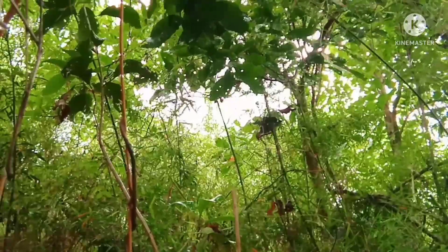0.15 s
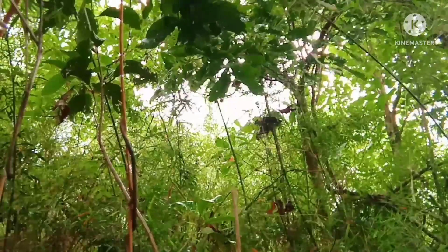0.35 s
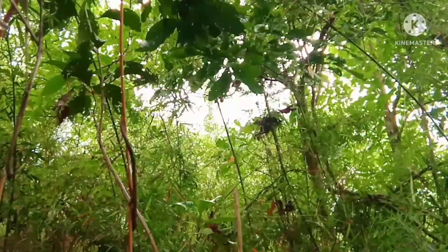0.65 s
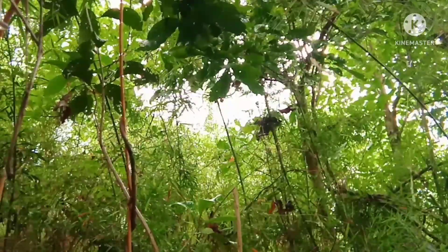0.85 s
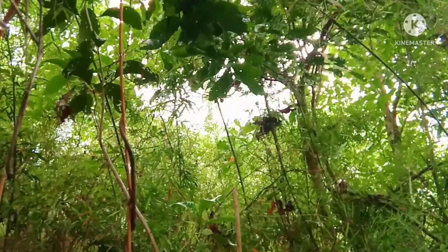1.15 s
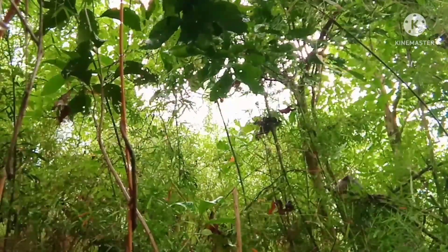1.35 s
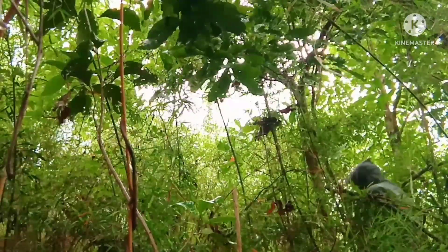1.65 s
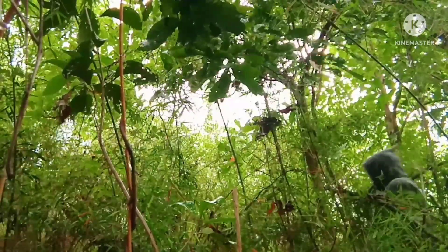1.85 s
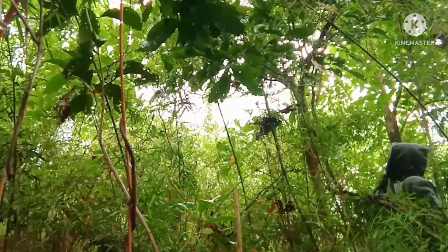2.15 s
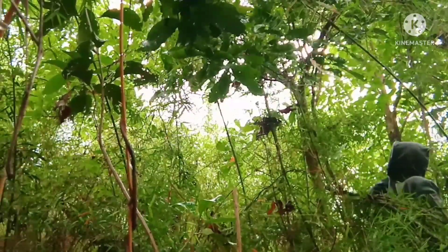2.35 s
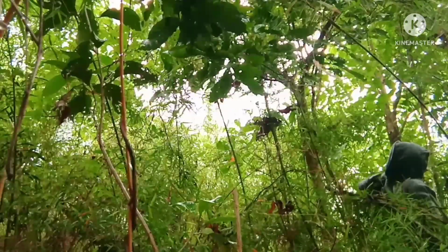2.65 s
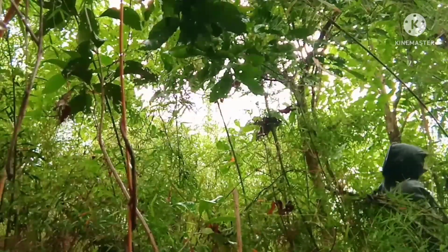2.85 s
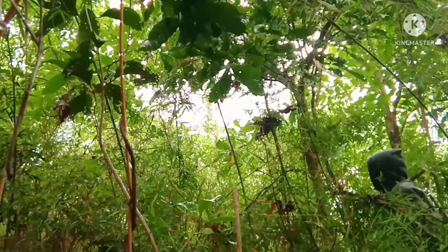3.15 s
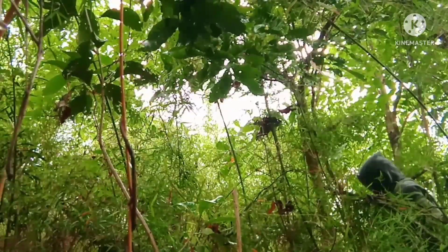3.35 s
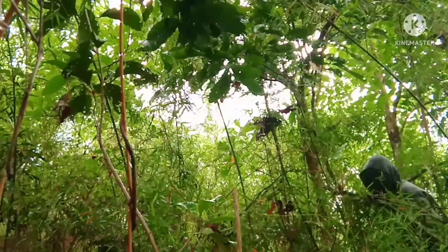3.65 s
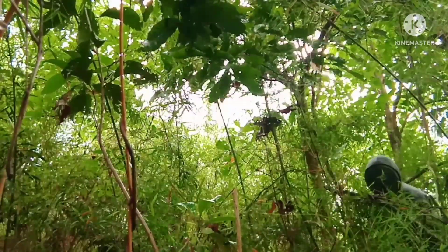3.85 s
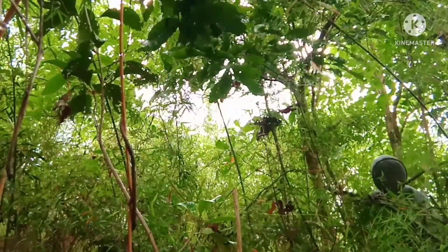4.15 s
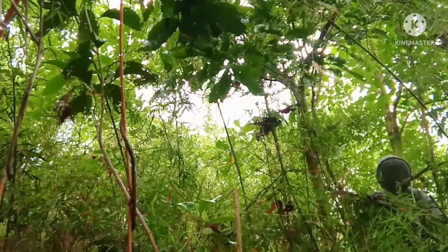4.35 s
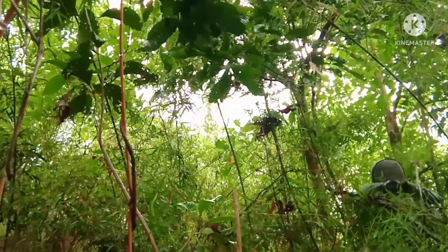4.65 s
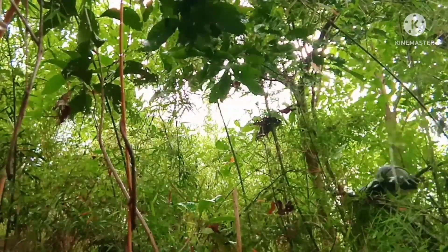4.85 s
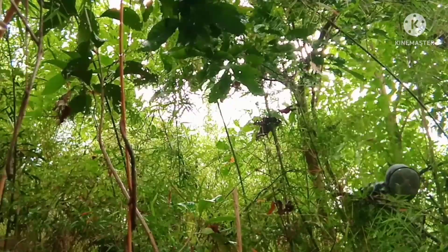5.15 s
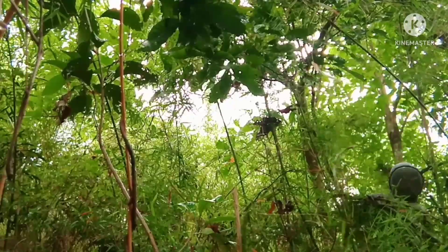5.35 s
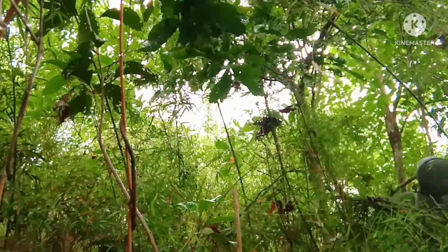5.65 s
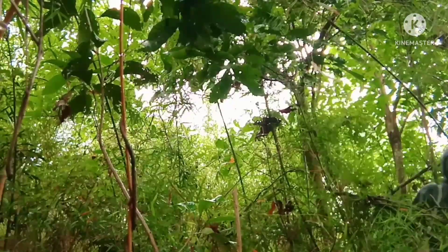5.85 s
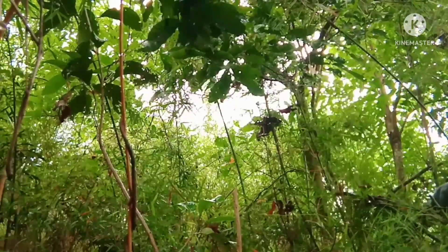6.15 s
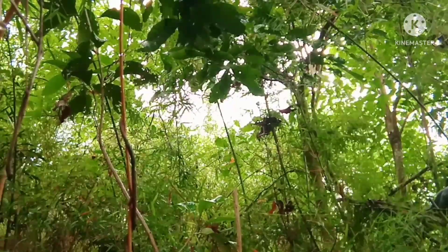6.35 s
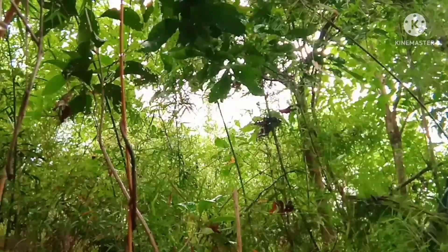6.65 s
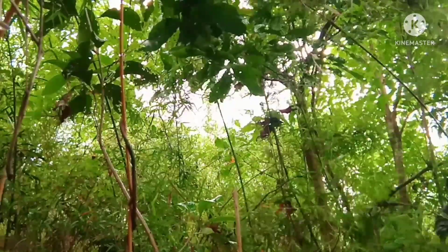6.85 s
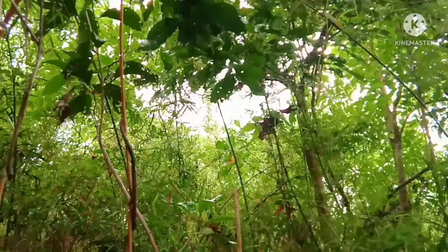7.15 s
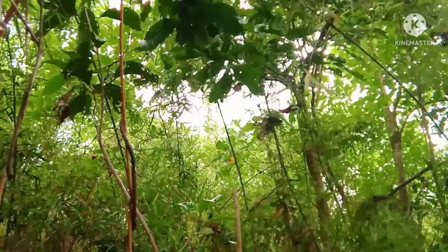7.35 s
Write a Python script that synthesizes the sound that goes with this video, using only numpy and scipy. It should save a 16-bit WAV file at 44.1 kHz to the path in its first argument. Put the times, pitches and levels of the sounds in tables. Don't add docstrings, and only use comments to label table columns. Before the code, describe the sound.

In a leafy thicket, one large bee hovers right at a small microphone, its low buzz wavering and rattling throughout. Smaller, slightly higher bees brush past around the middle and again near the end. The wing ticks become rougher in the second half. Behind are a faint swarm hum, bands of cicadas, airy wash, hissing foliage and crackling dry leaves, with a sharp twig snap close to the end.

```python
import sys
import numpy as np
from scipy import signal
from scipy.io import wavfile
from scipy.ndimage import uniform_filter1d

SR = 44100
rng = np.random.default_rng(int(sys.argv[2]) if len(sys.argv) > 2 else 0)


def gain_from_db(level_db):
    decades = np.asarray(level_db, float) / 20
    return 10 ** decades


def file_out(sig):
    cols = np.atleast_2d(sig).T
    lim = np.clip(cols, -1, 1)
    pcm = np.round(lim * 32767).astype(np.int16)
    wavfile.write(sys.argv[1], SR, pcm)


N = 330970
T = np.arange(N) / SR


def evened(x):
    return x / np.sqrt(np.mean(x ** 2) + 1e-20)


def curves(rows, t):
    s, *columns = np.transpose(rows)
    return [np.interp(t, s, c) for c in columns]


def bumps(rows, column):
    return sum(row[column] * np.exp(-((T - row[0]) / row[1]) ** 2) for row in rows)


def wander(hz):
    size = max(int(SR / hz), 1)
    smooth = uniform_filter1d(rng.standard_normal(N), size)
    return evened(uniform_filter1d(smooth, size))


def resonate(x, hz, width, times=1):
    r = np.exp(-np.pi * width / SR)
    for _ in range(times):
        x = signal.lfilter([1, 0, -1], [1, -2 * r * np.cos(2 * np.pi * hz / SR), r * r], x) * (1 - r)
    return x


def hiss(shape, patchy_db, bins, frames, size=1024):
    hop = size // 4
    hz, t = np.fft.rfftfreq(size, 1 / SR), np.arange(N // hop + 5) * hop / SR
    a, b, patches = rng.standard_normal((len(t), len(hz), 3)).T
    patches = uniform_filter1d(uniform_filter1d(patches, bins, 0), frames, 1)
    patches = np.clip(evened(patches), -3, 2.4)
    z = (a + 1j * b) * shape(hz[:, None], t) * gain_from_db(patchy_db * patches)
    return evened(signal.istft(z, nperseg=size, noverlap=size - hop)[1][:N])


# [t/s, effort level/dB, turned side-on 0-1, tilted at the microphone 0-1]
POSTURE = [(0.0, -27, -1.1, 0.36), (0.3, -24.3, -.4, .35), (0.75, -24, 0, 0), (1.0, -24.2, 0.6, 0.56),
           (1.5, -24.2, 0.08, 0), (2.0, -23.2, 0.3, 0.08), (2.6, -24, 0.13, .5), (3.0, -23.5, .2, 0.4),
           (3.3, -22.3, 0.65, 0.6), (3.5, -24.5, 0.55, 0.73), (3.75, -23, 0.47, 1), (4.0, -22.5, 1, 1),
           (4.75, -24.6, .8, 0.63), (5.25, -23.9, 0.47, 0.5), (5.5, -23, .85, 0.52), (6.2, -23.5, 1, 0.35),
           (6.75, -23, 0.86, 0.56), (7.5, -23.2, 0.84, 0.55)]


def posed(at_rest, side_gain, tilt_gain):
    _, side, tilt = curves(POSTURE, T)
    return at_rest + side_gain * side + tilt_gain * tilt


# [t/s, half length/s, extra level/dB]
BRUSHES = [
    (3.555, .035, 8),
    (3.885, .025, 5.5),
    (5.12, .03, 4),
]


def brushing():
    return bumps(BRUSHES, column=2)


# [t/s, half length/s, extra hiss level/dB, extra fizz level/dB]
STIRS = [(.7, 0.59, 6, 4.5), (1.7, 0.66, 8, 3.5), (3.05, 0.43, 6.5, 3.5), (3.75, 0.71, 4.5, 5),
         (5.3, 0.56, 5, 3.5), (6.45, .4, 7.5, 4), (6.85, 0.25, 2, 10), (7.5, 0.54, 10, 4)]


def stirring(column):
    return bumps(STIRS, column)


# [f/Hz, level/dB per Hz]
AIR_COLOUR = [(24, -21), (55, -24), (90, -2.5), (250, -9), (500, -10), (1300, -17), (2500, -28),
              (6500, -37), (7600, -40), (8500, -48), (10000, -51.5), (16000, -57)]


def air():
    f, db = np.transpose(AIR_COLOUR)
    shape = lambda hz, t: gain_from_db(np.interp(np.log(hz + 1), np.log(f), db))
    wash = hiss(shape, patchy_db=2.2, bins=24, frames=5, size=2048)
    wash_db = posed(-41.5, side_gain=2.5, tilt_gain=0) + brushing()
    still_from, still_to = 3.55, 5.32
    loose = np.clip(np.maximum(still_from - T, T - still_to) / .1, .1, 1)
    loose *= np.clip(T / .25, .4, 1)
    tremor = gain_from_db(-47.5) * loose * np.sin(2 * np.pi * 16 * T)
    return gain_from_db(wash_db) * wash + tremor


def choir(band, swell):
    centre_hz, drift, width, db = band
    shape = lambda hz, t: np.exp(-abs((hz - centre_hz - drift * t) / width) ** 3)
    song = hiss(shape, patchy_db=4.6, bins=2, frames=20, size=4096)
    return gain_from_db(db + curves(swell, T)[0]) * song


# [t/s, length/s, f/Hz, level/dB]
SINGERS = [(1.97, .4, 5430, -52), (2.12, .38, 5960, -53), (1.9, .55, 5764, -54), (2.3, .3, 6140, -54),
           (1.6, 0.97, 4950, -54), (.7, 0.4, 6080, -57), (2.9, .6, 6098, -57), (3.8, 0.51, 5680, -54),
           (4.3, .45, 6120, -54), (4.4, 1.2, 5120, -54), (7.07, .25, 4630, -50), (7.29, 0.24, 4670, -45.5),
           (7.3, 0.18, 6050, -57), (3.4, .5, 8350, -75), (6.71, 0.035, 11900, -79), (4.05, .06, 11850, -82),
           (4.165, 0.02, 11820, -82)]


def singers():
    out = np.zeros(N)
    for s, length, hz, db in SINGERS:
        part = out[round(s * SR):][:round(length * SR)]
        waver, throb = wander(hz=62.7)[:len(part)], wander(hz=90)[:len(part)]
        phase = 2 * np.pi * np.cumsum(hz * (1 + .0015 * waver)) / SR
        whistle = np.sin(phase) * gain_from_db(1.6 * throb)
        part += np.sqrt(2) * gain_from_db(db) * whistle * signal.windows.tukey(len(part), .3)
    return out


# [centre f/Hz, drift/Hz per s, width/Hz, level/dB]
CHOIRS = [
    (4950, 20, 705, -44),
    (5907, 12, 480, -48),
    (6890, 47, 460, -48.5),
    (8020, 21, 800, -67.5),
]
# [t/s, level/dB]
LOW_SWELL = [(0, -0.5), (.8, 2.5), (3, 0.1), (5, -2.5), (7, 1), (7.5, 1)]
HIGH_SWELL = [(0, -7), (.65, -18), (1.6, -7.5), (4.3, -0.5), (6.4, -1.7), (7.05, -7), (7.4, -20)]


def cicadas():
    steady = [(0, 0.0061)]
    swells = LOW_SWELL, steady, HIGH_SWELL, HIGH_SWELL
    return sum(choir(band, swell) for band, swell in zip(CHOIRS, swells)) + singers()


# [t/s, level/dB]
SWARM_LEVEL = [(0.0, -47.5), (7.5, -45.5)]
# [multiple of the wingbeat, level/dB]
SWARM_OVERTONES = [(1, 1), (2, 2.5), (3, -6.5), (4, -27), (5, -24.5), (6, -17.5)]


def swarm(count=14):
    out = np.zeros(N)
    for _ in range(count):
        hz = 152 * (1 + .035 * rng.standard_normal() + .03 * wander(hz=3))
        phase = 2 * np.pi * np.cumsum(hz) / SR
        hum = sum(gain_from_db(db) * np.cos(k * phase + k * k) for k, db in SWARM_OVERTONES)
        out += gain_from_db(3.5 * wander(hz=3)) * hum
    return gain_from_db(curves(SWARM_LEVEL, T)[0]) * evened(out)


def rustle():
    shape = lambda hz, t: np.exp(-((hz - 4200) / 1150) ** 2)
    return gain_from_db(-57 + stirring(column=2)) * hiss(shape, patchy_db=3.0, bins=12, frames=9)


# [t/s, peak level/dB]
LEAVES = [(0.7098, -55), (0.7214, -54), (1.0435, -52), (2.0797, -54), (3.5528, -40.5), (3.569, -45),
          (3.58, -50), (3.587, -46), (3.82, -56), (3.8606, -55), (3.909, -48), (3.941, -46), (4.3194, -57),
          (4.6295, -50), (4.9104, -54), (5.028, -52), (5.297, -48), (5.536, -39.5), (5.5424, -56),
          (5.81, -58), (6.613, -39), (6.8438, -57), (6.889, -41), (6.9855, -50), (7.015, -49), (7.02, -45),
          (7.0494, -46), (7.0858, -41), (7.122, -45), (7.489, -45.5)]
# [t/s, level/dB, f/Hz, rise/s]
TWIG = (7.0863, -18, 4750, .0007)


def leaves():
    t, out = np.arange(4000) / SR, np.zeros(N + 4000)
    fade = np.minimum(t / .0015, 1) * (np.exp(-t / .002) + .45 * np.exp(-t / .018))
    for s, db in LEAVES:
        burst = rng.standard_normal(4000) * fade
        crackle = gain_from_db(11) * resonate(burst, 2800, 4000, times=2)
        crackle += gain_from_db(-14) * resonate(burst, 9100, 6000)
        crackle += gain_from_db(4.5) * resonate(burst, 15100, 2200, times=2)
        out[round(s * SR):][:4000] += gain_from_db(db + 3) * crackle
    s, db, hz, rise = TWIG
    swell = t / rise * np.exp(1 - t / rise)
    out[round(s * SR):][:4000] += gain_from_db(db) * swell * np.sin(2 * np.pi * hz * t)
    return out[:N]


# [t/s, wingbeat f/Hz, distance/body lengths]
PASSING = [
    [(3.42, 148.6, 3.6), (3.49, 157.4, 1.15), (3.53, 155.6, 0.96), (3.57, 162.5, 1.2), (3.62, 160, 4)],
    [(3.84, 153, 3.8), (3.89, 152, 0.99), (3.96, 148, 2.1), (4.05, 152, 3.9)],
    [(4.22, 144.5, 4.7), (4.4, 139.8, 1.3), (4.46, 141, 1.8), (4.49, 152, 1.26), (4.56, 155, 1.22),
     (4.6, 153, 0.97), (4.64, 161.6, 1.8), (4.68, 156.2, 6)],
    [(7.08, 160.7, 2.5), (7.16, 159, 1.5), (7.26, 157, 1.8)],
]


def passing_bees():
    out = np.zeros(N)
    for rows in PASSING:
        span = slice(round(rows[0][0] * SR), round(rows[-1][0] * SR))
        hz, away = curves(rows, T[span])
        phase = 2 * np.pi * np.cumsum(hz * (1 + 0.005 * wander(hz=51)[span])) / SR
        upper = sum(gain_from_db(-7.5 * (k - 1.5)) * np.cos(k * phase + k * k) for k in range(2, 9))
        buzz = gain_from_db(-26) * away ** -8.5 * np.cos(phase)
        buzz += gain_from_db(-30.5) * away ** -1.7 * upper
        out[span] += np.sqrt(2) * buzz * signal.windows.tukey(len(hz), .2)
    return out


SNAP_TURN, TICK_TURN = .74, .85


def wing_tone(turns):
    edge = posed(-53.5, .1, 12.3)
    levels = [curves(POSTURE, T)[0], posed(-46, 12.7, .1), posed(-35.5, -2.5, .075),
              posed(-37, -.46, .34), posed(-45.5, 6, -.5) - 1.2, posed(-48, 5, -3),
              edge - 7, edge - 4, edge - 7.5, edge - 11]
    out, shiver, beat = np.zeros(N), wander(hz=67.4), np.gradient(turns) * SR
    for k, db in enumerate(levels, 1):
        if k <= 2:
            lag = (0, -.05)[k - 1]
        else:
            lag = k * SNAP_TURN + (-.115 if k < 7 else .275)
        flutter_db = (.45 if k == 1 else 1.3) * wander(hz=24.4) + (k > 4) * 1.2 * shiver
        dip_db = -5.5 * np.exp(-((k * beat - 678.5) / 68) ** 2)
        out += np.sqrt(2) * gain_from_db(db + flutter_db + dip_db) * np.cos(2 * np.pi * (k * turns - lag))
    return out


# [t/s, length/s]
MISSES = [(1.49, .03), (5.5, .02), (5.87, .04), (6.005, .015), (6.272, .022), (6.44, .012), (6.503, .03),
          (6.59, .035)]


def blows(turns, at, spread_db, late, miss_db):
    hit = np.flatnonzero(np.diff(np.floor(turns - at)) > 0)
    luck = rng.standard_normal((len(hit), 2))
    missed = sum(abs(T[hit] - s) < length / 2 for s, length in MISSES)
    place = np.clip(hit + (late * SR * luck[:, 0]).astype(int), 0, N - 1)
    train = np.zeros(N)
    train[place] = gain_from_db(spread_db * luck[:, 1] + miss_db * missed)
    return train


# [t/s, length/s, tick level/dB]
GRAZES = [(1.55, 0.25, -59), (2.153, .3, -62), (3.145, 0.12, -59), (3.55, 0.047, -51), (3.946, 0.062, -54),
          (4.4, .25, -60), (4.79, 0.036, -52), (4.9, 0.033, -54), (5.007, 0.041, -48), (5.35, .03, -45),
          (5.408, 0.11, -48.5), (5.536, 0.076, -52), (5.775, .07, -47), (5.899, .14, -45.5),
          (6.035, .24, -43), (6.27, .22, -42.5), (6.52, 0.061, -50), (6.61, 0.026, -52),
          (6.697, 0.021, -46), (6.774, 0.041, -70), (6.87, 0.034, -47), (6.966, 0.025, -46),
          (7.09, 0.088, -58), (7.244, 0.031, -47), (7.335, 0.02, -48), (7.4, 0.02, -55), (7.476, .05, -56)]


def grazing():
    contact = np.zeros(N)
    for s, length, db in GRAZES:
        inside = np.minimum(T - s, s + length - T)
        contact += gain_from_db(db) * np.clip(inside / .01 + .5, 0, 1)
    return contact


def snap_rings(turns, contact):
    snap = blows(turns, SNAP_TURN - .155, spread_db=2.0, late=.00008, miss_db=-6)
    snap = signal.sosfilt(signal.butter(4, 3000, fs=SR, output="sos"), snap)
    low_gain = gain_from_db(posed(-53, 2.2, 7.4) + 2.0 * wander(hz=30)) + gain_from_db(-1.5) * contact
    high_gain = gain_from_db(posed(-54, 5.36, -2.2) + 1.9 * wander(hz=27))
    low = evened(resonate(snap, 1250, 160, times=2))
    high = evened(resonate(snap, 1966, 1150, times=2))
    return low_gain * low - high_gain * high


def wing_ticks(turns, contact):
    tick = blows(turns, TICK_TURN, spread_db=2.1, late=.0001, miss_db=-12)
    stray = gain_from_db(-68 + 4.5 * wander(hz=36))
    tick = resonate(resonate(tick, 3300, 2200), 3500, 2400, times=2)
    return (contact + stray) * evened(tick)


def edge_fizz(turns):
    puffs = .4 + np.cos(2 * np.pi * (turns - .23)) ** 4
    shape = lambda hz, t: np.exp(-((hz - 15100) / 750) ** 2)
    fizz = hiss(shape, patchy_db=2.5, bins=30, frames=3)
    return gain_from_db(-73 + stirring(column=3)) * evened(fizz * puffs)


# [t/s, wingbeat f/Hz]
HOVER_BEAT = [(0.0, 123.8), (0.3, 113.5), (0.81, 117), (0.98, 113.7), (1.38, 119.3), (1.65, 116.5),
              (1.95, 117.8), (2.05, 113.5), (2.21, 117), (3.2, 115.8), (3.55, 120.7), (4.49, 119.4),
              (4.74, 123.2), (5.41, 117.5), (6.08, 113), (6.37, 113.2), (6.54, 116.4), (7.5, 116.8)]
# [t/s, extra wingbeat f/Hz]
DODGES = [
    [(3.55, 0), (3.575, 9.5), (3.63, 8), (3.74, 17.5), (3.84, 16.5), (3.89, 1.5), (3.91, 10.5), (3.97, 3),
     (4.3, 0)],
    [(4.8, 0), (4.95, -4), (5.03, -8), (5.14, 3.5), (5.26, 3.5), (5.41, 0)],
]


def near_bee():
    beat = curves(HOVER_BEAT, T)[0] + sum(curves(rows, T)[0] for rows in DODGES)
    stumble = (.004 + .002 * brushing()) * wander(hz=40)
    turns = np.cumsum(beat * (1 + stumble + .003 * wander(hz=9))) / SR
    contact = grazing()
    return wing_tone(turns) + snap_rings(turns, contact) + wing_ticks(turns, contact) + edge_fizz(turns)


def scene():
    background = air() + cicadas() + swarm() + rustle() + leaves()
    return (background + passing_bees() + near_bee())[None]


def low_pass(x):
    return signal.sosfilt(signal.butter(12, 16870, fs=SR, output="sos"), x)


def record(dry):
    lowpass = signal.firwin(801, 15650, window=("kaiser", 8), fs=SR)
    limited = signal.oaconvolve(dry, lowpass[None], "same")
    return low_pass(limited)


dry = scene()
out = record(dry)
file_out(out)
```